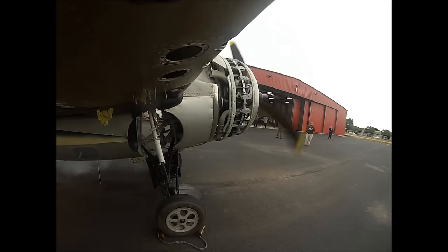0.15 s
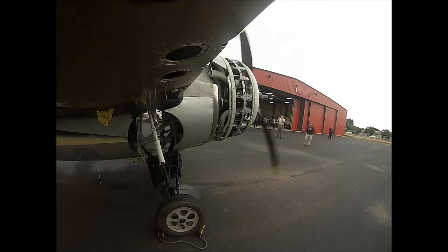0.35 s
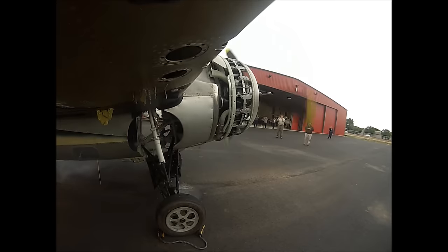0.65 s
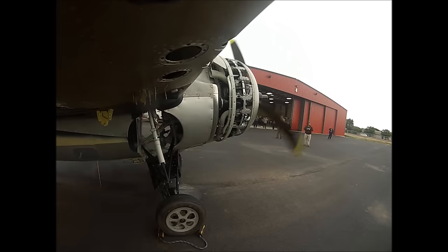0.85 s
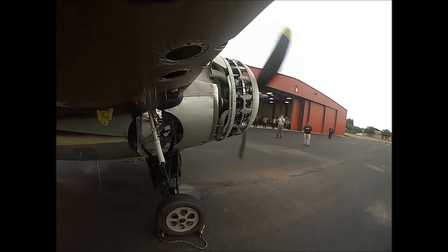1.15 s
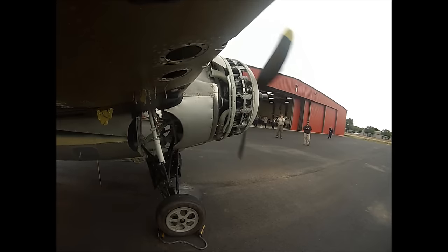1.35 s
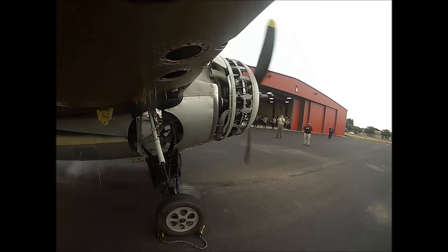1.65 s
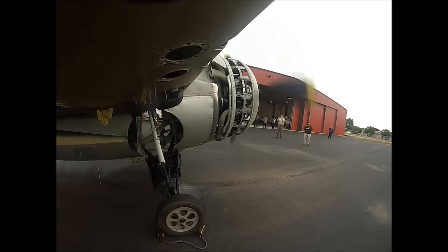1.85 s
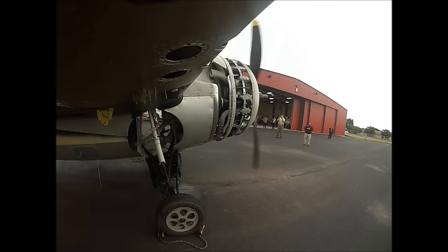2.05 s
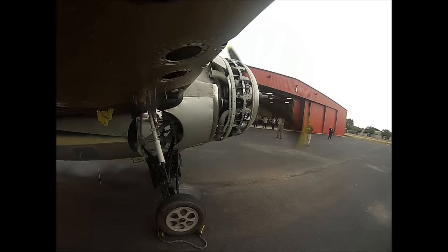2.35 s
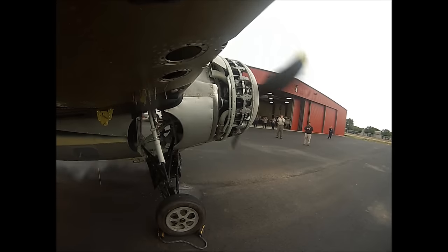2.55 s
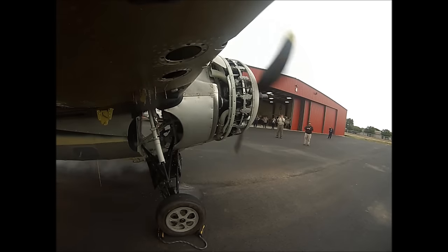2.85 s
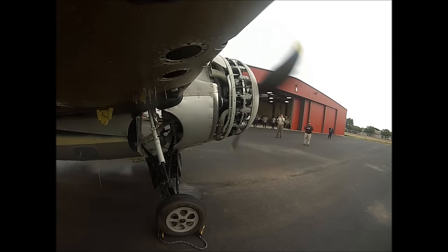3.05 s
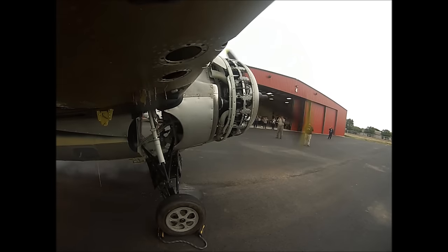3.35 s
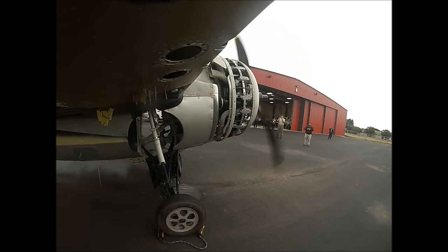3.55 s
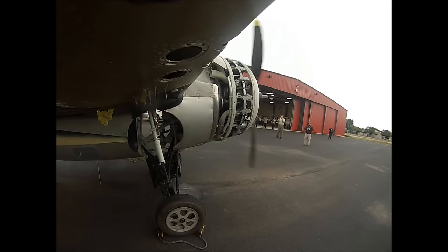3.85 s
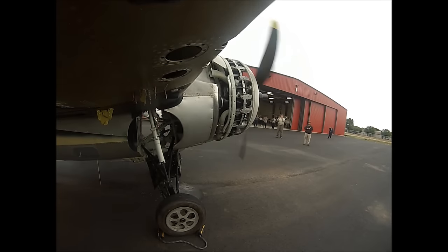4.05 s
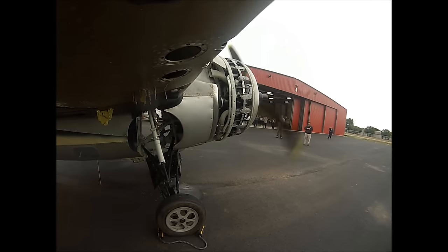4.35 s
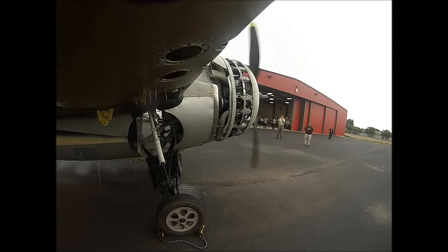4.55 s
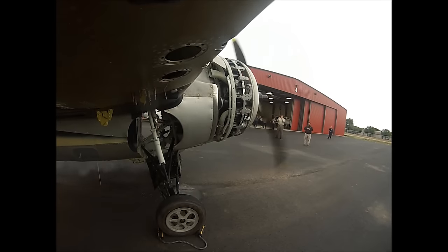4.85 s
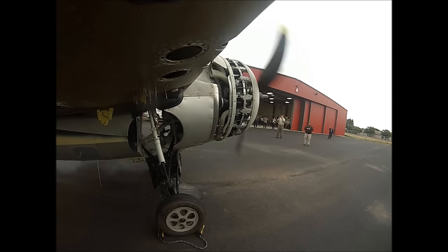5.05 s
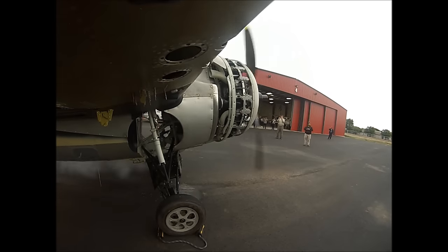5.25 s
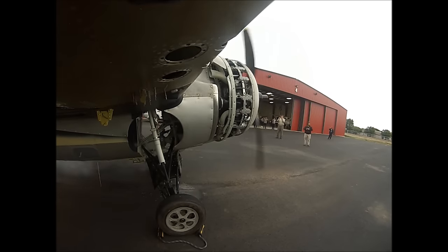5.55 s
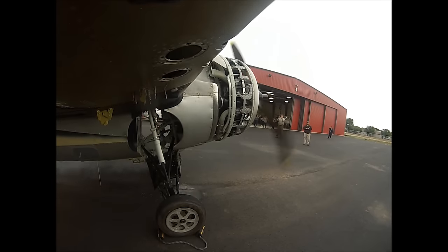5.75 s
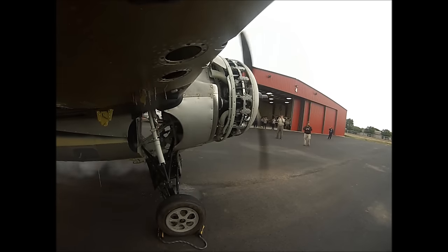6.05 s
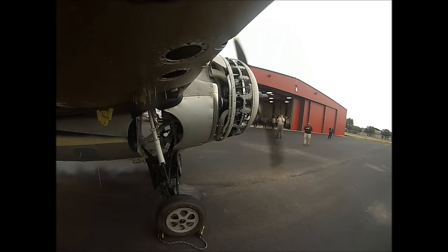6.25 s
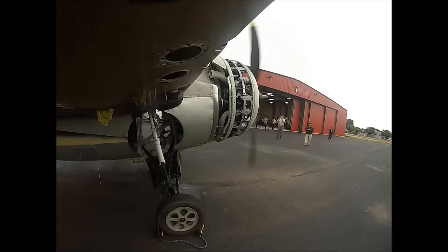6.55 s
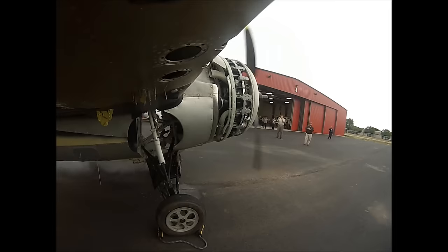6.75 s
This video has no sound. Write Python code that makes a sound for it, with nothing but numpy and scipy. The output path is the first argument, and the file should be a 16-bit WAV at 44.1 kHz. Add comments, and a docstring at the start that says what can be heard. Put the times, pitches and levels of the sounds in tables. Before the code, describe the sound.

A big radial piston engine, just caught, lopes unevenly with paired hissing exhaust puffs, hollow pops and low drone, gradually gathering speed.

```python
"""Open ramp, under the wing: a big radial piston engine has just caught and lopes unevenly, gathering speed.
Near exhaust stacks spit puffs in pairs: shaped noise for the jet hiss, noise through resonances for the ring.
Decaying tones make the pops, clatter, knocks, thuds and thumps; far stacks murmur in lumps of noise.
The collector pipe drones on kept-up resonances; the airframe shakes in sines at multiples of the cycle rate,
over a low noise rumble."""
import sys
import numpy as np
from scipy import signal
from scipy.fft import rfft, irfft
from scipy.io import wavfile
from scipy.ndimage import uniform_filter1d

SR = 44100
rng = np.random.default_rng(int(sys.argv[2]) if len(sys.argv) > 2 else 0)


def to_wav(sig):
    """Store sig (one row per channel, or 1-D mono) as 16-bit WAV at the path in sys.argv[1].

    Samples outside -1..1 are clipped; the rate is SR.
    """
    pcm = np.clip(np.atleast_2d(sig), -1, 1) * 32767
    pcm = np.round(pcm).astype(np.int16)
    wavfile.write(sys.argv[1], SR, pcm.T)  # frames by channels


def to_linear_factor(level_db):
    """Convert decibel levels (scalar or array-like) to linear amplitude factors."""
    exponent = np.asarray(level_db, float) / 20
    return 10 ** exponent


N = 303849


def rms_one(x):
    """Scale to rms 1."""
    return x / np.sqrt(np.mean(x ** 2) + 1e-20)


def in_time(rows):
    """Columns of a table as straight-line curves, one value a sample."""
    s, *columns = np.transpose(rows)
    return [np.interp(np.arange(N) / SR, s, column) for column in columns]


def coloured(spectrum):
    """Noise with the given dB per Hz, nothing above the last point; rms 1."""
    hz, level_db = np.transpose(spectrum)
    log_hz = np.log(np.arange(1, N // 2 + 2) * SR / N)
    gain_db = np.interp(log_hz, np.log(hz), level_db, right=-120)
    return rms_one(irfft(rfft(rng.standard_normal(N)) * to_linear_factor(gain_db), N))


def resonate(x, modes):
    """Parallel two-pole resonances, signs alternating."""
    out = 0
    for k, (hz, width_hz, level_db) in enumerate(modes):
        r = np.exp(-np.pi * width_hz / SR)
        ring = signal.lfilter([1, 0, -1], [1, -2 * r * np.cos(2 * np.pi * hz / SR), r * r], x)
        out = out + (-1) ** k * to_linear_factor(level_db) * (1 - r * r) / 2 * ring
    return out


def twice(x, mode):
    """One resonance applied twice: steep skirts, dark valleys."""
    hz, width_hz, level_db = mode
    return resonate(resonate(x, [mode]), [(hz, width_hz, 0)])


def drift(rate_hz):
    """Low-passed noise as slow chance, rms 1."""
    r = np.exp(-2 * np.pi * rate_hz / SR)
    return rms_one(signal.lfilter([1], [1, -2 * r, r * r], rng.standard_normal(N + SR))[SR:])


# Engine cycles, one round of the near stacks each.
# Each row: start in seconds, hiss of the pair in dB, ring of lead, follower and fourth stack in dB.
CYCLES = [(-0.056, -28, -15, -14, -21), (0.199, -24.5, -22, -22, -24.5), (0.449, -24, -16, -12.5, -19),
          (0.707, -25.5, -20.5, -15, -21), (0.961, -25.5, -23, -22, -27), (1.223, -26, -22, -17, -25),
          (1.491, -28, -31, -26, -24), (1.752, -23.5, -14, -29, -36), (1.967, -26.5, -34, -24.5, -19),
          (2.19, -25, -23.5, -24, -28), (2.406, -23.5, -21, -17.5, -18), (2.615, -25.5, -15.5, -22.5, -19),
          (2.821, -24.5, -16, -20, -24.5), (3.018, -24, -20.5, -15.5, -27.5),
          (3.213, -25.5, -20.5, -14.5, -25), (3.407, -26, -26, -20.5, -30.5),
          (3.6, -24.5, -17.5, -15.5, -26.5), (3.788, -27.5, -26, -19.5, -38), (3.983, -25, -20, -21.5, -19),
          (4.172, -25, -25, -20.5, -25.5), (4.358, -30, -21.5, -19, -31), (4.546, -25, -29, -24, -20),
          (4.723, -24.5, -24.5, -16, -36), (4.902, -26, -27, -19.5, -25), (5.077, -27.5, -31, -18.5, -25.5),
          (5.251, -29, -23, -33, -26.5), (5.425, -28, -18.5, -20, -22), (5.595, -27.5, -22.5, -24, -33),
          (5.766, -26.5, -23.5, -53, -24.5), (5.932, -30.5, -22.5, -23.5, -32),
          (6.098, -30.5, -27, -26.5, -26), (6.263, -30, -22.5, -21, -25.5), (6.425, -31.5, -30, -20.5, -26),
          (6.594, -27.5, -25, -39, -35.5), (6.757, -29.5, -21.5, -25, -26.5), (6.922, -31, -21, -25, -28)]
# When each near stack speaks, as a share of the cycle.
STACK_TURN = [0, 0.105, 0.36, 0.535, 0.81]
# How early each near stack rings, in seconds.
RING_LEAD_S = [0.00087, 0.0013, 0.0084, 0, 0]
# Strong kicks bring the later stacks in early. Each row: cycle start in seconds, lead in seconds.
SURGES = [(1.752, 0.0156)]
# Cylinders that miss. Each row: time in seconds, loss of hiss and ring in dB.
MISFIRES = [(0.083, 8.5), (0.587, 28), (1.103, 32), (1.32, 15), (1.365, 16), (1.772, 42), (1.866, 29),
            (2.305, 15), (3.893, 18)]
FOLLOWER_DB = -0.5   # hiss against the lead
LEAN_DB_PER_DB = 0.072   # the pair's hiss leans toward the stack that rings harder
THIRD_DB, FOURTH_DB, FIFTH_DB = -32.5, -26, -51.5   # hiss at time 0
THIRD_RING_DB, FIFTH_RING_DB = -25.5, -41.5
SETTLE_DB_PER_S = 0.74   # third and fourth stack calm down as the engine warms
UNEVEN_DB = 0.55   # spread from puff to puff


def firing():
    """Every cycle five near stacks puff in turn, bar misfires; rows (s, hiss dB, ring dB, ring lead s)."""
    s, pair_db, lead_db, follow_db, fourth_db = np.transpose(CYCLES[:-1])
    period_s = np.diff(np.array(CYCLES)[:, 0])
    times = s[:, None] + period_s[:, None] * STACK_TURN
    for when, lead_s in SURGES:
        times[np.argmin(abs(s - when)), 2:] -= lead_s
    calm_db = SETTLE_DB_PER_S * s
    lean_db = LEAN_DB_PER_DB * (lead_db - follow_db)
    hiss_db = np.c_[pair_db + lean_db, pair_db + FOLLOWER_DB - lean_db,
                    THIRD_DB - calm_db, FOURTH_DB - calm_db, FIFTH_DB + 0 * s]
    ring_db = np.c_[lead_db, follow_db, THIRD_RING_DB - calm_db, fourth_db, FIFTH_RING_DB + 0 * s]
    chance_db = UNEVEN_DB * rng.standard_normal((len(s), 2))
    hiss_db[:, 2:4] += chance_db
    ring_db[:, 2] += 2 * chance_db[:, 0]
    rows = np.c_[times.ravel(), hiss_db.ravel(), ring_db.ravel(), np.tile(RING_LEAD_S, len(s))]
    for when, loss_db in MISFIRES:
        rows[np.argmin(abs(rows[:, 0] - when)), 1:3] -= loss_db
    rows = rows[(rows[:, 0] > 0) & (rows[:, 0] < N / SR)]
    return rows[np.argsort(rows[:, 0])]


def cycle_count():
    """Engine cycles run so far, one value a sample."""
    return np.interp(np.arange(N) / SR, np.array(CYCLES)[:, 0], np.arange(len(CYCLES)))


FIRINGS_PER_CYCLE, MURMUR_LUMP_DB = 9, 5   # lump spread before clipping


def far_lumps():
    """Gain of the far stacks: one short lump at each firing, each of its own strength; rms 1."""
    count = FIRINGS_PER_CYCLE * cycle_count()
    chance = np.clip(rng.standard_normal(FIRINGS_PER_CYCLE * len(CYCLES)), -2, 1.2)
    strength = to_linear_factor(MURMUR_LUMP_DB * chance)
    return rms_one(0.67 + strength[count.astype(int)] * np.sin(np.pi * count) ** 2)


# How long a valve stroke lasts as the engine gathers speed. Each row: time in seconds, factor.
SLOWNESS = [(0, 1.57), (1.5, 1.33), (3, 1.24), (6.89, 1.1)]


def blowdown(puffs, level_db, lag_s, rise_s, fall_db_s, tail_db, tail_db_s):
    """Gas flow at every puff: it swells as the valve opens, falls fast, then trails off; powers add."""
    power = np.zeros(N + SR)
    for (s, hiss_db, *_), peak in zip(puffs, to_linear_factor(level_db)):
        drag_db = min(-.45 * min(hiss_db + 30.5, 0), 6)   # feeble puffs drag
        slowness = np.interp(s, *np.transpose(SLOWNESS)) * to_linear_factor(drag_db)
        t = np.arange(SR // 5) / SR / slowness
        after = np.maximum(t - rise_s, 0)
        swell = np.sin(np.pi / 2 * np.minimum(t / rise_s, 1)) ** 2
        shape = swell * (to_linear_factor(-fall_db_s * after) + to_linear_factor(tail_db - tail_db_s * after))
        i = max(round((s + lag_s) * SR), 0)
        power[i:i + len(t)] += (peak * shape) ** 2
    return np.sqrt(power[:N])


# Jet body, jet top and far hiss. Each row: frequency in Hz, density in dB per Hz (relative).
JET = [(250, 16), (500, 6.5), (1000, -13), (2500, -26), (4000, 3.5), (8000, -12), (11000, -50)]
JET_TOP = [(5000, -2), (8500, -1), (11500, -1), (12800, -12.5), (16000, -9.5)]
FAR_HISS = [(800, 1), (2500, -1), (4500, -8), (5800, -10), (7200, -10), (8800, -22.5), (11000, -23.5),
            (15000, -34)]
# Jet whistles, coloured by which stack of a pair speaks. Each row: frequency in Hz, width of one pass in Hz,
# leading or lone puff in dB, close follower in dB, dB per dB of stack ring, fading in dB per second.
JET_PEAKS = [(3350, 570, -4, 2.5, 0.68, 0.4), (5165, 1200, 1, 0.5, 0.33, -0.4),
             (6810, 780, 0.5, -1.5, 0.06, 0), (7530, 3100, 1, 0.5, 0.36, -0.26)]
TICKS_PER_S = 500   # mean rate of the metallic ticks that, with steady noise, set the whistles off


def jets(puffs, far_db):
    """Crackling hiss: strong puffs reach the top, weak ones whistle in the middle treble, far ones blur."""
    s, hiss_db, ring_db, _ = np.transpose(puffs)
    follower = np.diff(s, prepend=-1) < .033
    weak_db = np.minimum(hiss_db + 33, 0)   # a feeble jet loses its top faster still
    crackle = to_linear_factor(1.42 * drift(210))
    broad_db = -30.0 + 1.1 * (hiss_db + 27) + 0.19 * weak_db
    top_db = -32.5 + 1.72 * (hiss_db + 28.0) + .9 * weak_db
    broad = coloured(JET) * blowdown(puffs, broad_db, -0.007, 0.014, 820, -18.5, 400)
    top = coloured(JET_TOP) * blowdown(puffs, top_db, -0.0074, 0.012, 2000, -43, 400)
    far = coloured(FAR_HISS) * to_linear_factor(0.5 * far_db - 24.0) * np.sqrt(far_lumps())
    out = crackle * (broad + top * to_linear_factor(2.3 * drift(240))) + far
    for hz, width_hz, lead_db, follow_db, pull, fade_db_s in JET_PEAKS:
        ticks = rms_one((rng.random(N) < TICKS_PER_S / SR) * rng.standard_normal(N))
        source = ticks + 1.44 * rng.standard_normal(N)
        flutter = to_linear_factor(np.clip(5.2 * drift(52.0), -9, 5))
        whistle = rms_one(twice(source, (hz, width_hz, 0))) * flutter
        pull_db = pull * np.maximum(ring_db + 21.0, -10)
        level_db = hiss_db - 8.0 - fade_db_s * s + pull_db + np.where(follower, follow_db, lead_db)
        out += whistle * blowdown(puffs, level_db, -0.011 + 30 / hz, 0.011, 1200, -40, 194)
    return out


# Resonances in three groups: cowling panels, first and second family of the short stacks.
# Each entry: frequency in Hz, width of one pass in Hz, level in dB.
STACK = [
    [(326, 87, 7.5), (428, 54, -3.5), (552, 130, -5), (688, 50, 2), (822, 200, -6)],
    [(1315.3, 61, 15.5), (1427.5, 190, 16), (1554.6, 57, 14.5), (1637, 20, 8.5)],
    [(1797, 180, -4), (2038, 187, 0.5), (2172, 100, 3), (2325, 127, 7), (2558, 245, -5.5),
     (2800, 1130, -8.5)],
]


def stacks(puffs, far_db):
    """Lumpy gas flow rings cowling and stacks, each mode by its own chance; far stacks murmur in lumps."""
    s, hiss_db, ring_db, lead_s = puffs.T
    puffs = np.c_[s - lead_s, hiss_db]
    murmur = to_linear_factor(far_db) * far_lumps()
    cowl_db = 0.42 * hiss_db + 0.55 * ring_db - 14.5
    high_db = 0.5 * ring_db + 0.31 * hiss_db - 7.0
    cowl = np.hypot(blowdown(puffs, cowl_db, -0.024, 0.021, 187, -43, 200), to_linear_factor(.5 * far_db - 22.5))
    low = np.hypot(blowdown(puffs, ring_db, -0.0033, 0.007, 550, -60, 202), murmur)
    high = np.hypot(blowdown(puffs, high_db, -0.0026, 0.012, 1040, -15.5, 200), murmur * to_linear_factor(-12.0))
    out = 0
    lumps = to_linear_factor(np.clip(1.1 * drift(62), -9, 7))   # shared by all modes
    for modes, flow, patchy_db in zip(STACK, (cowl, low, high), (1.5, 2.2, 3.0)):
        gain = 1 / np.std(sum(twice(rng.standard_normal(N // 8), mode) for mode in modes))
        for mode in modes:
            patches = to_linear_factor(patchy_db * drift(12.4))
            out = out + twice(gain * rng.standard_normal(N) * lumps * flow * patches, mode)
    return out


# Pipe resonances in three groups, the main one first, then its neighbours.
# Each entry: frequency in Hz, width in Hz (the main one passes twice), level in dB.
PIPE = [
    [(92.4, 8.8, -2.5), (123.9, 4.04, -3)],
    [(171.45, 6.7, 2), (158.8, 7.1, 4.5), (201, 49, -11)],
    [(273.14, 10.1, 1.5), (295.7, 7.2, 0.5), (257, 8.3, -3)],
]
# Level of each group, low to high. Each row: time in seconds, level in dB.
HUM_LOW = [(0, -18), (0.19, -24), (0.38, -19.5), (0.75, -29), (1.15, -30), (1.34, -15), (1.55, -26),
           (1.91, -18.5), (2.11, -25.5), (2.87, -21.5), (3.1, -25), (3.64, -21.5), (3.95, -21.5),
           (4.21, -18.5), (4.5, -26), (4.78, -15), (5.2, -23), (5.36, -34.5), (5.58, -18.5), (6.35, -30),
           (6.7, -20.5), (6.89, -46)]
HUM_MID = [(0, -21.5), (0.19, -32.5), (0.57, -19), (0.8, -33.5), (1.3, -19.5), (1.53, -31.5), (2.11, -14),
           (2.28, -45.5), (2.55, -18), (2.87, -28.5), (3.4, -23.5), (3.7, -30), (4.05, -31.5), (4.4, -20),
           (4.75, -32.5), (5.7, -27), (5.93, -21.5), (6.3, -33), (6.89, -24.5)]
HUM_HIGH = [(0, -22), (0.4, -22.5), (0.65, -37), (1.15, -21.5), (1.55, -35), (1.91, -22.5), (2.49, -21.5),
            (2.68, -30), (2.87, -22.5), (3.25, -25.5), (4.05, -27), (4.59, -34), (4.95, -22), (5.2, -39),
            (5.55, -24.5), (6.1, -29), (6.89, -29.5)]


def collector(puffs):
    """Each main resonance is kept ringing as a firm wavering hum; puffs and chance stir its neighbours."""
    pushes = np.zeros(N)
    pushes[(puffs[:, 0] * SR).astype(int)] = to_linear_factor(1.04 * puffs[:, 2])
    drive = 0.64 * rms_one(pushes) + rng.standard_normal(N)
    group_db = in_time(HUM_LOW) + in_time(HUM_MID) + in_time(HUM_HIGH)
    out = 0
    for (main, *others), level_db in zip(PIPE, group_db):
        hum = rms_one(twice(drive, main)) * to_linear_factor(1.3 * drift(11.0))
        hum = hum / np.sqrt(uniform_filter1d(hum ** 2, SR // 6) + 0.093)   # evens out the level
        beside = resonate(drive, others) / np.std(resonate(drive, [main]))
        out = out + to_linear_factor(level_db) * hum + to_linear_factor(uniform_filter1d(level_db, SR)) * beside
    return signal.sosfilt(signal.butter(4, 420, fs=SR, output="sos"), out)   # the drone stays below about 420 Hz


# Shake on multiples of the cycle rate. Each row: time in seconds, third to seventh multiple in dB rms.
SHAKE_ORDERS = [(0, -36, -24, -17, -19, -16), (1.1, -20, -19.5, -30, -58, -14.5),
                (1.75, -33, -14, -45, -23, -23), (2.2, -22, -27, -27, -14.5, -18),
                (2.85, -40, -22, -14.5, -18, -50), (3.4, -18, -16.5, -16.5, -37, -26),
                (3.7, -39, -13.5, -26, -29, -26), (4.4, -19, -15, -18.5, -45, -34),
                (5.2, -23, -13.5, -26, -42, -43), (6.89, -21, -12.5, -25, -50, -52)]


def airframe():
    """The wing shakes on low multiples of the cycle rate; the strongest changes as the engine gathers speed."""
    turn = 2 * np.pi * cycle_count()
    out = 0
    for k, level_db in enumerate(in_time(SHAKE_ORDERS), start=3):
        level = np.sqrt(2) * to_linear_factor(level_db + 0.86 * drift(5.5))
        out = out + level * np.sin(k * turn + rng.uniform(0, 2 * np.pi) + 0.062 * drift(0.97))
    return out


# Each row: frequency in Hz, density in dB per Hz (relative).
RUMBLE = [(12, -23), (16, 4), (44, -1.5), (70, 7), (330, -10), (420, -53), (1000, -46)]


def rumble():
    """Low noise that swells slowly by chance."""
    return to_linear_factor(-26.5 + 1.5 * drift(2.1)) * coloured(RUMBLE)


def bangs(rows, rise_s, fall_s, rough):
    """Each bang is a short tone that swells and dies, torn by turbulence and slightly bent in pitch."""
    out, t = np.zeros(N + SR), np.arange(SR // 8) / SR
    torn = np.r_[1 + rough * drift(150), np.ones(SR)]
    swell = np.sin(np.pi / 2 * np.minimum(t / rise_s, 1)) ** 2
    shape = swell * np.exp(-(np.maximum(t - rise_s, 0) / fall_s) ** 2)
    for (s, level_db, hz), (phase, bend) in zip(rows, rng.uniform(-1.11, 1, (len(rows), 2))):
        tone = np.sin(2 * np.pi * hz * (t + 2 * bend * t ** 2) + np.pi * phase)
        i = round(s * SR)
        out[i:i + len(t)] += to_linear_factor(level_db) * shape * tone
    return (out * torn)[:N]


# Each row: share of the cycle, level in dB at a pair hiss of -22 dB, mean starting pitch in Hz.
THUDS = [(0.075, -26.5, 365), (0.21, -29, 364), (0.35, -39, 600), (0.53, -38, 625)]


def thuds():
    """Each cycle knocks the cowling four times, harder when the pair of stacks hisses harder."""
    rows = []
    for (s, pair_db, *_), (later, *_) in zip(CYCLES[1:], CYCLES[2:]):
        for share, level_db, hz in THUDS:
            rows.append((s + share * (later - s), level_db + 0.5 * (pair_db + 22), hz))
    chance = rng.standard_normal((len(rows), 2)) * [2.5, 30.0]   # dB, Hz
    return bangs(np.array(rows) + np.c_[np.zeros(len(rows)), chance], 0.0096, 0.0098, 0.15)


# Each row: start in seconds, level in dB, starting pitch in Hz.
KNOCKS = [(0.335, -22.5, 523), (0.843, -21, 460), (1.617, -21.5, 517), (2.088, -24.5, 552),
          (2.517, -23, 530)]


def knocks():
    """Knocks through the cowling: short mid-pitched tones."""
    return bangs(KNOCKS, 0.0075, 0.0056, 0.27)


# Each row: start in seconds, level in dB, starting pitch in Hz.
POPS = [(0.4868, -8, 1434), (0.739, -17, 1297), (1.262, -11, 1545), (1.628, -16.5, 1395),
        (1.756, -12, 1580), (2.0984, -11.5, 1490), (2.4269, -13, 1337), (2.5317, -11, 1513),
        (2.6174, -20, 1415), (2.7402, -26, 1460), (2.9393, -18.5, 1580), (3.029, -10, 1393),
        (3.224, -19, 1475), (4.2008, -11.5, 1435), (4.575, -12, 1496), (4.654, -15.5, 1357),
        (5.262, -14, 1327), (5.4336, -18.5, 1340), (5.7907, -17, 1466)]


def pops():
    """Sharp pops in the short stacks, at the pitch of their first family."""
    return bangs(POPS, 0.0035, 0.0081, 0.13)


# Each row: start in seconds, level in dB, starting pitch in Hz.
THUMPS = [(0.842, -10, 175), (1.299, -11, 171), (1.365, -14.5, 180), (1.912, -9.5, 176), (2.457, -15, 258),
          (3.01, -19, 145), (4.141, -11.5, 163), (4.946, -17, 256)]


def thumps():
    """Thumps in the collector pipe: low tones, slower to swell and die."""
    return bangs(THUMPS, 0.011, 0.026, 0.14)


# Each row: start in seconds, level in dB, starting pitch in Hz.
CLATTER = [(1.2331, -20, 2180), (1.6322, -14, 2230), (1.7589, -16, 2320), (2.1011, -13, 2300),
           (2.2026, -15, 2270), (2.2735, -18.5, 2420), (2.645, -18, 2220), (2.8305, -14, 2100),
           (3.0285, -16, 2130), (3.7983, -21, 2230), (4.1824, -20, 2304), (4.6503, -25, 2250)]


def clatter():
    """Clatter of the second stack family: high rough tones, quick to rise."""
    return bangs(CLATTER, 0.0013, 0.013, 0.33)


# Dips of the microphone housing. Each row: frequency in Hz, gain in dB.
NOTCHES = [(3970, -7), (4860, -4.5), (5600, -4), (6350, -6.5), (7450, -2), (8300, -0.5), (8900, -1.5),
           (14000, -1)]
NOTCH_WIDTH = 0.029   # share of the frequency


def housing_colour(x):
    """The microphone housing colours the exhaust: narrow dips in the treble."""
    hz = np.arange(N // 2 + 1) * SR / N
    gain_db = sum(dip_db * np.exp(-((hz / dip_hz - 1) / NOTCH_WIDTH) ** 2) for dip_hz, dip_db in NOTCHES)
    return irfft(rfft(x) * to_linear_factor(gain_db), N)


# Level of the far stacks. Each row: time in seconds, level in dB.
FAR = [(0, -34), (0.19, -45), (0.38, -29), (0.6, -40), (1.3, -40), (1.72, -28.5), (2.11, -26.5), (2.3, -35),
       (2.49, -27), (2.68, -37), (2.87, -27), (3.06, -41), (3.44, -30.5), (3.64, -37), (4.05, -33),
       (5.17, -34.5), (5.36, -39), (5.6, -33.5), (6.89, -39.5)]


def scene():
    """All layers on one channel."""
    puffs, (far_db,) = firing(), in_time(FAR)
    exhaust = jets(puffs, far_db) + stacks(puffs, far_db) + knocks() + pops() + clatter()
    mix = housing_colour(exhaust) + collector(puffs) + airframe() + rumble() + thuds() + thumps()
    return mix[None]


def roll_off(x):
    """The treble ends steeply here."""
    return signal.sosfilt(signal.butter(12, 15540, fs=SR, output="sos"), x)


def record(dry):
    """Peaks are rounded, then the top is cut."""
    rounded = 1.053 * np.tanh(dry / 1.556)
    top_cut = signal.cheby2(12, 60, 15950, fs=SR, output="sos")   # 60 dB down from 15950 Hz
    return roll_off(signal.sosfilt(top_cut, rounded))


dry = scene()
out = record(dry)
to_wav(out)
```